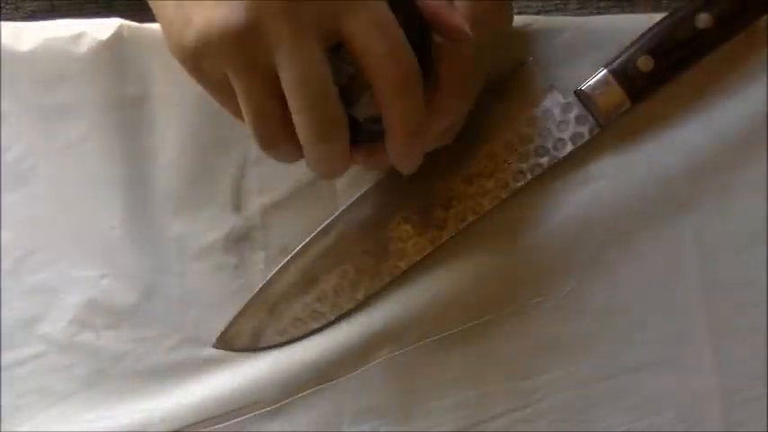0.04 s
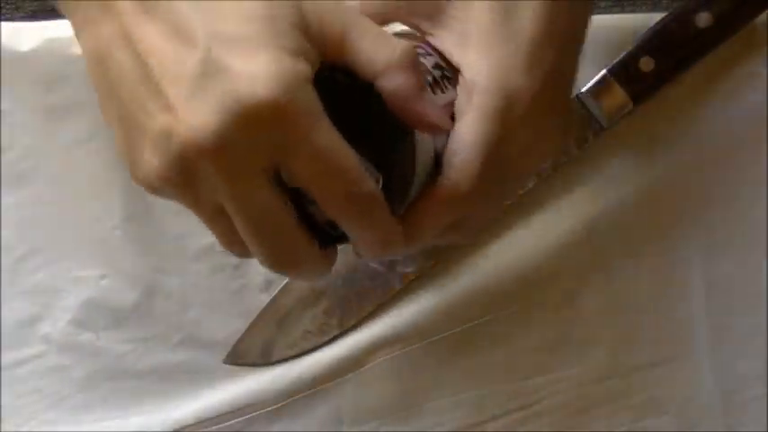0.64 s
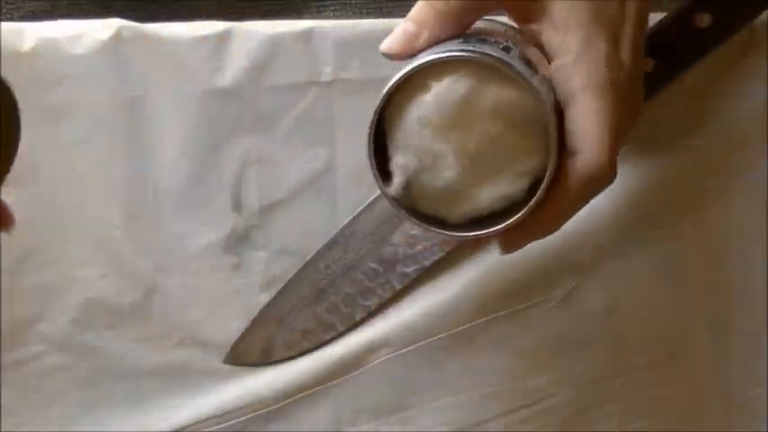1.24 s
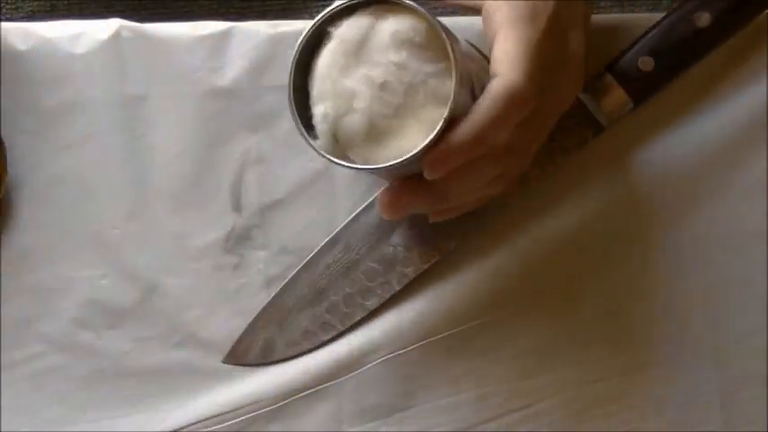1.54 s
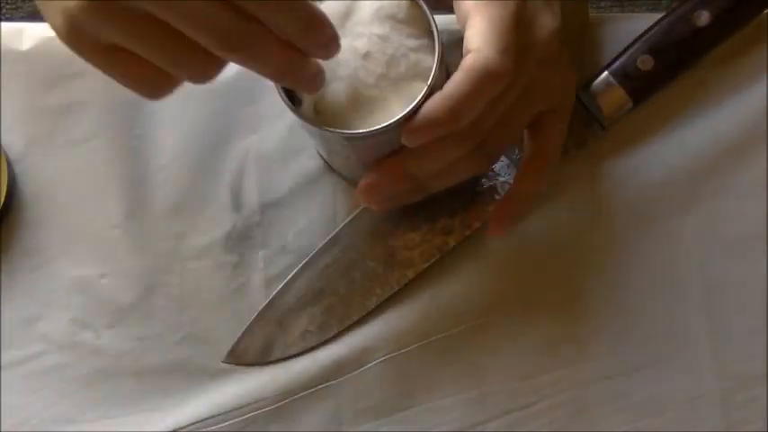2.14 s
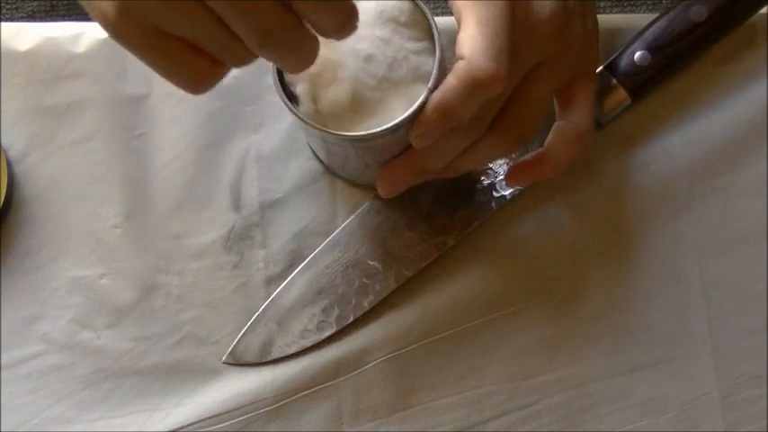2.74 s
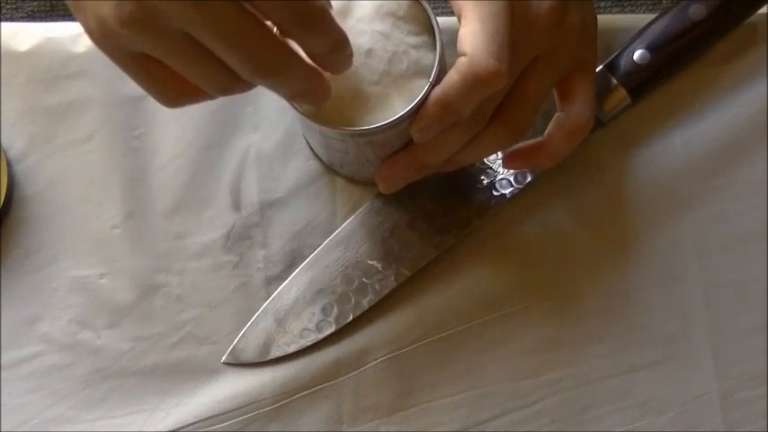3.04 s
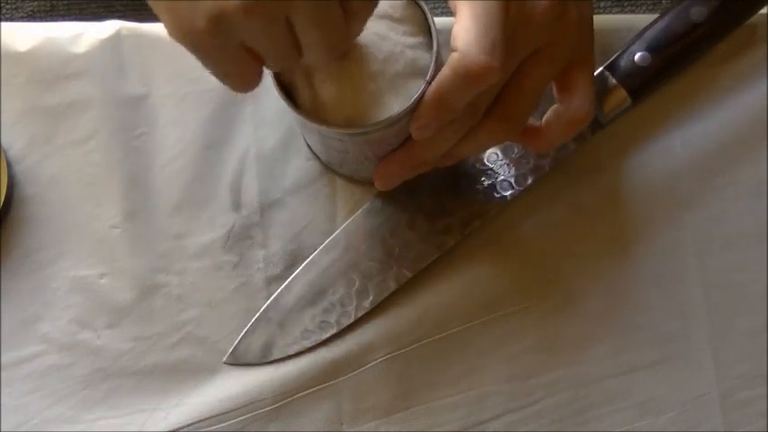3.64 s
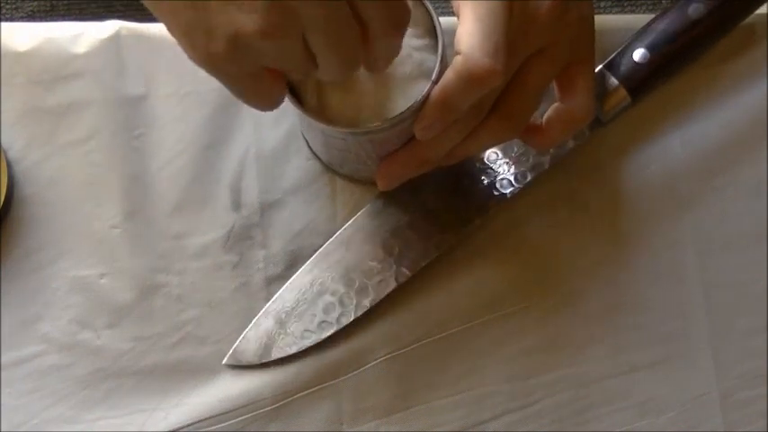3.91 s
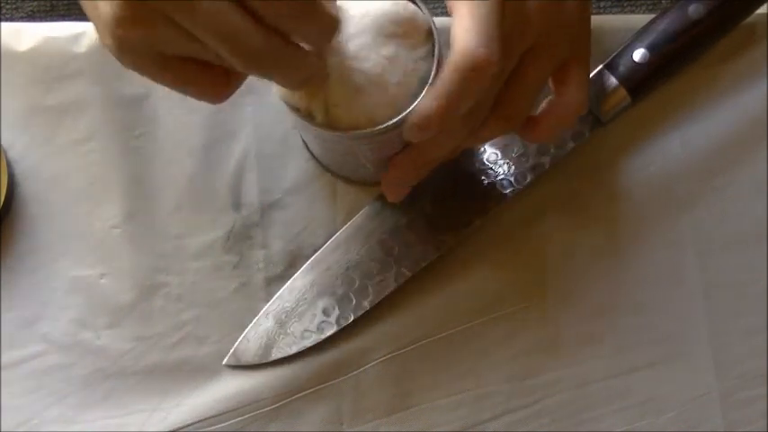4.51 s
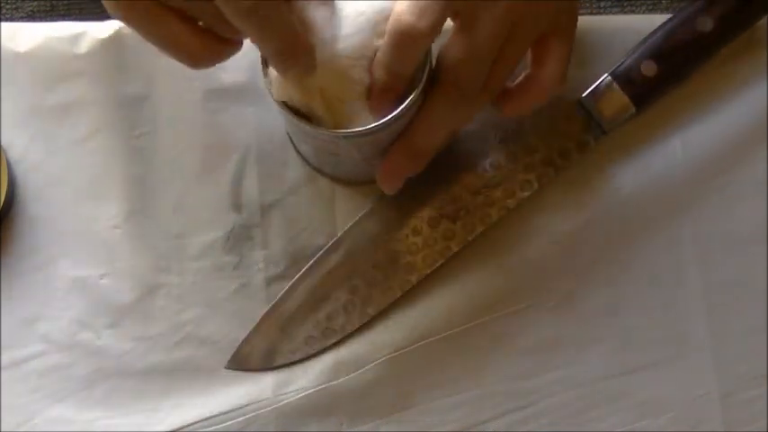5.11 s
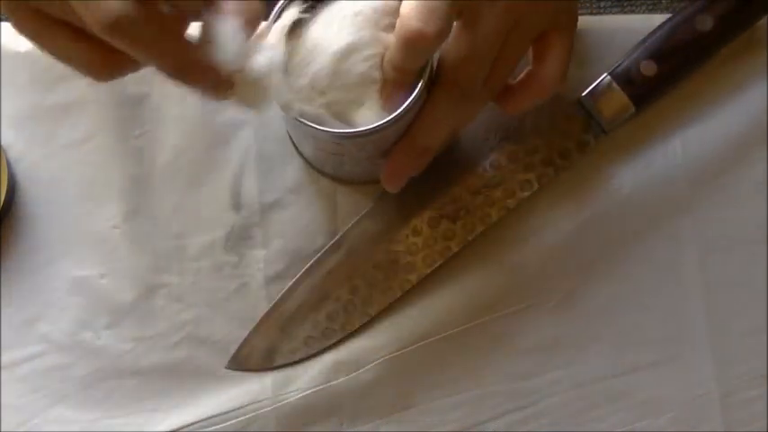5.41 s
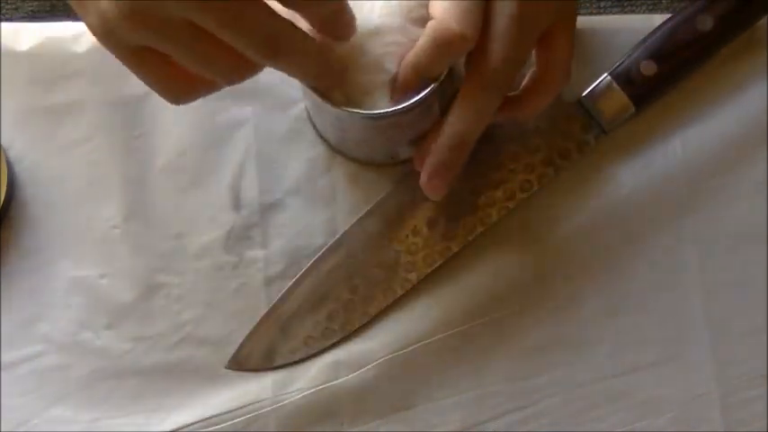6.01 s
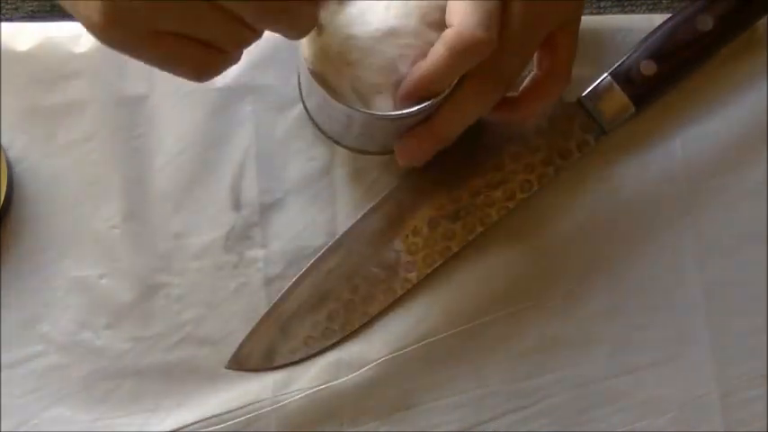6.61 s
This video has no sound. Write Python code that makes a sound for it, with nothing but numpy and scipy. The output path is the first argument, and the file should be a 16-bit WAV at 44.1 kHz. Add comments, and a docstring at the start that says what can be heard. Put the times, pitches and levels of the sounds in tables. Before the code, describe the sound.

Hands pull the lid off a small metal tin, clink it against a steel knife, then pick at wadding inside with light ticks.

```python
"""Hands knock dully on a small metal tin and drag its lid off by stick-slip friction; its wall sings briefly.
At 1.5 s the tin is set down against a steel knife on a cloth-covered table: the impact excites the modes
of tin, blade and table top. Fingers then pick at the soft wadding inside: nails tick on the rim, the tin
bumps the table, skin and fibre rub and squeak. Throughout, faint high pips come and go over a steady
rush of air in a small room, heard by a close stereo microphone."""
import sys
import numpy as np
from scipy import signal
from scipy.fft import rfft, irfft, next_fast_len
from scipy.io import wavfile
from scipy.ndimage import uniform_filter1d

SR = 44100
rng = np.random.default_rng(int(sys.argv[2]) if len(sys.argv) > 2 else 0)


def bounce(signal):
    """Save signal as a 16-bit WAV file at the path given by the first command-line argument."""
    frames = np.transpose(np.atleast_2d(signal))
    limited = np.clip(frames, -1, 1)
    pcm = np.round(limited * 32767).astype(np.int16)
    wavfile.write(sys.argv[1], SR, pcm)


N = 302526

# The tin lands against the blade and settles: (time [s], level [dB])
CLINKS = [(1.5399, -35), (1.5436, -14.5), (1.563, -26.5)]
# Spectrum of a hard contact: (frequency [Hz], spectral level [dB])
CLINK_SPECTRUM = [(250, -35), (600, 10.5), (1200, 5.5), (2060, 4), (2700, -4.5), (3300, -4), (4400, -4.5),
                  (7000, -8.5), (8800, -30), (11000, -45), (15000, -39)]

def clinks(sweep_s=0.001585, clack_hz=1950, clack_t60=0.0077, chatter_decay_s=0.0048):
    """Dispersion: treble runs ahead in thin metal as a crack; the base then clacks and chatters."""
    out, sweep_t, t = np.zeros(N), clock(sweep_s), clock(.05)
    bending_wave = signal.chirp(sweep_t, 14000, sweep_s, 500, "logarithmic")
    bending_wave *= signal.windows.tukey(len(sweep_t), .1)
    crack = signal.fftconvolve(np.diff(bending_wave), click(CLINK_SPECTRUM, tilt_db=-1.5))
    clack = ring([(clack_hz, 0, clack_t60)])
    for s, db in CLINKS:
        touches = rng.choice([-1, 1], len(t)) * (rng.random(len(t)) < .04)
        chatter = signal.fftconvolve(touches * np.exp(-t / chatter_decay_s), click(CLINK_SPECTRUM))
        add(out, s, blow(crack, db - 2))
        add(out, s + 0.000885, blow(clack, db - 6.5))
        add(out, s + 0.001034, blow(chatter, db - 9))
    return out

# Modes of tin and blade: (frequency [Hz], level [dB], T60 [s])
STEEL_MODES = [(677, -10, 0.17), (793, -5.5, 0.24), (950, -9, 0.33), (950, -4, 0.085), (1160, -15, 0.22),
               (1267, -9, 0.47), (1504, -6, 0.21), (1800, -10.5, 0.17), (1780, -31, 0.15), (1820, -30, .2),
               (2100, -5, 0.22), (2120, -5, 0.23), (3150, -0.5, 0.37), (3380, -26, .24), (4140, -22, .2),
               (4437, -19, .22), (5830, -27, .45)]

def steel_ring(rise_s=0.0011):
    """Free vibration: tin and blade ring on in their natural modes after each impact."""
    out, sound = np.zeros(N), fade_in(ring(STEEL_MODES), rise_s)
    for s, db in CLINKS:
        add(out, s, blow(sound, db - 5))
    return out

# Lid and fingers knock on the held tin: (time [s], level [dB], frequency [Hz], relative edge level [dB])
KNOCKS = [(0.5036, -37.5, 406, -31), (0.5532, -29, 432, -11), (0.6946, -37.5, 467, -8.5),
          (0.819, -25.5, 447, -22), (4.5925, -40, 675, -10)]
# Modes of the closed tin as a drum: (frequency [Hz], level [dB], T60 [s])
HOLLOW_MODES = [(373, -1, 0.021), (577.5, 1, 0.45), (661, -1.5, 0.19)]

def knocks(push_cycles=0.73, edge_decay_s=0.0028):
    """Heavy damping: the hand limits a knock to about one cycle, with a hard edge and a hollow ring."""
    out, t = np.zeros(N), clock(.05)
    for s, db, hz, edge_db in KNOCKS:
        cycles = hz * t
        push = np.sin(2 * np.pi * cycles) * cycles * np.exp(-2 * cycles / push_cycles)
        grit = rng.standard_normal(len(t)) * np.exp(-t / edge_decay_s)
        edge = signal.fftconvolve(grit, click(CLINK_SPECTRUM))
        add(out, s, blow(push, db))
        add(out, s + 0.0007, blow(edge, db + edge_db))
        add(out, s, blow(ring(HOLLOW_MODES), db - 10))
    return out

# Friction envelope of the lid, in three surges: (time [s], level [dB])
LID_DRAG = [(.818, -44), (.832, -42), (.847, -57), (.856, -37.5), (.88, -41), (.9, -49.5), (.928, -42),
            (.96, -55)]
# Spectrum of sliding contact: (frequency [Hz], spectral level [dB])
FRICTION_SPECTRUM = [(300, -15), (1200, -5), (3200, 4.5), (6500, 2), (9000, -4), (12000, -9.5),
                     (16000, -32)]

def lid_scrape():
    """Stick-slip friction: metal scrapes on metal in coarse slips as the lid is pulled off."""
    out, (times, level_db) = np.zeros(N), np.transpose(LID_DRAG)
    drag = amp(np.interp(times[0] + clock(times[-1] - times[0]), times, level_db))
    force = slips(len(drag), per_s=4000, spread_db=3) * drag
    scrape = tin_response(force, FRICTION_SPECTRUM, tilt_db=-2.5, rim_db=-7)
    add(out, times[0], np.linalg.norm(drag) * unit(scrape))
    return out

# The lid or the open tin sings when touched: (time [s], frequency [Hz], level [dB])
WALL_TONES = [(.553, 2026, -44), (.695, 3030, -54), (1.135, 2130, -45.5), (1.41, 2140, -54.5),
              (1.52, 2160, -45), (2.164, 3830, -39), (2.399, 3360, -53), (2.43, 3740, -41)]

def wall_tones(split=0.012, rise_s=0.00072):
    """Mode splitting: the tin is not quite round, so a wall mode has a weaker, lower twin."""
    out = np.zeros(N)
    for s, hz, db in WALL_TONES:
        t60 = 0.35 * (2120 / hz) ** 2.3  # higher modes die sooner
        twins = ring([(hz, db, t60), (hz * (1 - split), db - 7, t60 / 2)])
        add(out, s, fade_in(twins, rise_s))
    return out

# Nails strike the tin: (time [s], level [dB], place [0 wall to 1 rim])
TICKS = [(0.819, -36.5, 1), (0.9432, -47, 0.4), (1.2042, -49, 0.014), (1.528, -40, 0.77),
         (1.917, -46, 0.24), (2.1643, -33.5, 0.86), (2.168, -37, 0.3), (2.4, -32, 0.39),
         (2.4301, -36, 0.24), (2.488, -48.5, 0.3), (3.0641, -45, 0.88), (3.283, -41.5, 0.87),
         (3.3164, -44.5, 1), (3.441, -53, 0.84), (3.9804, -46, 0), (4.5907, -46, 0), (4.9204, -37.5, 0.87),
         (5.1919, -50, 0.29), (5.5927, -52.5, 0), (6.1329, -49.5, 0.84)]
# Spectrum of a nail contact: (frequency [Hz], spectral level [dB])
TICK_SPECTRUM = [(300, -20), (1000, 9.5), (2400, 0), (3900, 6.5), (5000, 3.5), (8500, -1), (12500, -7.5),
                 (16000, -18)]
RIM_RING_DB = (-28, 6)  # ring against direct sound, for contact on the wall and on the rim

def nail_ticks(catch=0.078):
    """Impulsive excitation: a nail catches, then slips; nearer the rim it is briefer and brighter."""
    out, t = np.zeros(N), clock(.025)
    for s, db, place in TICKS:
        decay_s, tilt_db = between((0.0045, 0.0023), place), between((-3, 3), place)
        force = unit(rng.standard_normal(len(t)) ** 3 * np.exp(-t / decay_s))
        force[0] += catch
        tick = tin_response(force, TICK_SPECTRUM, tilt_db, between(RIM_RING_DB, place), shift=0.059)
        add(out, s, blow(tick, db))
    return out

# Modes of the rim: (frequency [Hz], level [dB], T60 [s])
RIM_MODES = [(5460, 26, 0.025), (6120, 14, 0.011), (5800, -48, 0.0033), (4900, 15, 0.0089),
             (7700, 12, .012)]

def tin_response(force, spectrum, tilt_db, rim_db, shift=0.087):
    """Convolution: a force is heard directly and through the rim, whose modes shift with every grip."""
    modes = [(hz * (1 + shift * rng.uniform(-1.2, 1)), db, t60) for hz, db, t60 in RIM_MODES]
    response = amp(rim_db) * unit(ring(modes, .05))
    add(response, 0, click(spectrum, tilt_db))
    return signal.fftconvolve(force, response)

# The tin bumps the table; a pressing hand shortens the ring:
# (time [s], level [dB], contact cut-off [Hz], ring time [factor])
BUMPS = [(0.1477, -29.5, 1200, 0.32), (1.486, -36, 250, 1), (1.5437, -29, 416, 0.55),
         (1.845, -29, 1310, 0.77), (1.931, -39, 221, 0.73), (1.973, -43, 220, 0.56),
         (2.8331, -27.5, 446, 0.46), (3.79, -46.5, 300, 0.5), (4.922, -27, 1240, 0.56),
         (4.98, -27.5, 480, 1), (5.098, -32.5, 220, 0.53), (6.191, -47, 253, 0.29)]

def table_bumps(rebound_s=0.0215):
    """Mechanical coupling: the table answers each bump, its rebound, and ticks once the tin stands."""
    out, set_down_s = np.zeros(N), CLINKS[-1][0]
    for s, db, cut_hz, hold in BUMPS:
        add(out, s, thud(db, cut_hz, hold))
        add(out, s + rebound_s, thud(db - 8.5, cut_hz * 0.66, hold))  # the tin rocks back, more softly
    for s, db, _ in TICKS:
        if s > set_down_s:
            add(out, s, thud(db - 3, cut_hz=1200, hold=0.69))
    return out

# Modes of the table top: (frequency [Hz], level [dB], T60 [s])
TABLE_MODES = [(156, -13, 0.098), (190.2, -1.2, 0.32), (245.4, 2.5, 0.084), (305.6, 6, 0.053),
               (403, 2.5, 0.081), (467, -0.5, 0.072), (566, 2, 0.032), (685, -2, 0.047), (978, 6.5, 0.014),
               (1077, -7, 0.038), (1730, -7.5, 0.017)]

def thud(db, cut_hz, hold, shift=0.1, uneven_db=2):
    """Contact as a low-pass filter: the softer the tap, the fewer upper modes of the table answer."""
    t = clock(.5)
    modes = np.zeros(len(t))
    for hz, mode_db, t60 in TABLE_MODES:
        detune, uneven = rng.uniform(-1, 1, 2) * (hz > 300)  # upper modes vary with the spot struck
        decay = amp(mode_db + uneven_db * uneven - 60 * t / (t60 * hold))
        contact_gain = 1 / np.hypot(1, np.square(hz / cut_hz))
        build = 1 - np.exp(-t * hz)  # a mode takes about a cycle to get going
        modes += contact_gain * decay * build * np.sin(2 * np.pi * hz * (1 + shift * detune) * t)
    cycles = 0.42 * cut_hz * t
    tap = np.sin(2 * np.pi * cycles) * np.exp(-cycles / 0.42)
    return -blow(modes, db + 3) - blow(tap, db - 13)

# Skin and wadding slide over the tin: (time [s], duration [s], level [dB], place [0 wall to 1 rim])
RUBS = [(0.133, 0.092, -52.5, 0.48), (0.563, 0.045, -55, 0.47), (1.41, .163, -59, 0.44),
        (1.601, 0.098, -51, 0.47), (1.695, .09, -55, 0.59), (2.708, 0.033, -53.5, .05),
        (3.782, 0.058, -59.5, .95), (4.683, 0.068, -56, 0), (5.153, 0.33, -68, 0.75),
        (5.392, 0.079, -56, 0.59), (6.141, 0.11, -67, .9), (6.269, .2, -63, 1)]

def rubs():
    """Sliding friction: firm strokes of skin and wadding excite the tin."""
    out = np.zeros(N)
    for s, length_s, db, place in RUBS:
        add(out, s, stroke(length_s, db, place))
    return out

def stroke(length_s, db, place, fingers=3):
    """Incoherent summation: each finger slips in its own way while the pressure swells and fades."""
    size = int(length_s * SR)
    pressure = np.interp(np.linspace(0, 1, size), [0, 0.34, 1], [0, 1, 0]) ** 0.32
    tilt_db, rim_db = between((-7, 9.5), place), between(RIM_RING_DB, place)  # brighter at the rim
    forces = (slips(size, per_s=6000, spread_db=2) * pressure for _ in range(fingers))
    sound = sum(tin_response(force, FRICTION_SPECTRUM, tilt_db, rim_db) for force in forces)
    return amp(db) * np.sqrt(size) * unit(sound)

def slips(size, per_s, spread_db):
    """Friction as shot noise: a dense, random run of tiny slips of uneven strength."""
    strength = np.minimum(rng.exponential(1, SR // 2), 4)
    slipping = rng.random(SR // 2) < per_s / SR
    sign = rng.choice([-1, 1], SR // 2)
    return (sign * amp(spread_db * strength) * slipping)[:size]

# Fingertips squeak on the metal: (time [s], duration [s], frequency [Hz], level [dB])
SQUEAKS = [(0.85, 0.014, 5488, -38.5), (.938, .0102, 6840, -45), (4.678, .043, 2700, -59.5),
           (4.681, .057, 8450, -60.5), (4.93, .018, 8800, -49), (6.133, .019, 5430, -50.5)]

def squeaks(wobble=0.052):
    """Stick-slip oscillation: skin grips and releases at a high, unsteady rate."""
    out = np.zeros(N)
    for s, length_s, hz, db in SQUEAKS:
        drift = uniform_filter1d(rng.standard_normal(SR // 4), size=25) * np.sqrt(25)
        slip_hz = hz * (1 + wobble * drift[:int(length_s * SR)])
        tone = np.sin(2 * np.pi * np.cumsum(slip_hz) / SR)
        add(out, s, 2 * amp(db) * tone * np.hanning(len(tone)))
    return out

def plucks(start_s=2.7, per_s=5, mean_length_s=.08, mean_db=-66.5, spread_db=4):
    """Light friction: fingers pluck at the wadding at a loose, uneven pace."""
    out = np.zeros(N)
    for k, (late, length, strength, place) in enumerate(rng.random(size=(30, 4))):
        s = start_s + (k + late) / per_s
        db = mean_db + spread_db * (2 * strength - 1)
        if s < N / SR:
            add(out, s, stroke(mean_length_s * (.5 + length), db, between((.15, .75), place)))
    return out

# Runs of faint pips: (start [s], end [s], chance that a beat sounds [0 to 1])
PIP_RUNS = [(0.048, .7, 0.29), (1.739, 2.11, 0.99), (2.868, 4.82, .35), (5.589, 6.84, 0.57)]

def pips(hz=3900, spacing_s=.0335, db=-53, uneven_db=5):
    """Windowed tone bursts: very faint high pips come and go on a quick, even beat."""
    out, t = np.zeros(N), clock(.008)
    pip = np.hanning(len(t)) * np.sin(2 * np.pi * hz * t)
    for start, end, chance in PIP_RUNS:
        for s, (draw, weakness) in zip(np.arange(start, end, spacing_s), rng.random(size=(80, 2))):
            if draw < chance:
                add(out, s, amp(db - uneven_db * weakness) * pip)
    return out

# The rush of air and its bass end, both: (frequency [Hz], spectral level [dB])
AIR_SPECTRUM = [(88, -34), (150, -4.5), (213, 0.5), (296, -4.5), (366, -1.5), (481, -3), (751, -5),
                (827, -5.5), (894, -7.5), (1340, -8.5), (2650, -19), (3980, -21.5), (4650, -22.5),
                (5650, -24), (15500, -33)]
RUMBLE_SPECTRUM = [(20, -27.5), (40, -20), (52, -20), (60, -6), (72, -14), (100, -16), (125, -15)]
# Likeness of the air at left and right: (frequency [Hz], correlation [-1 to 1])
AIR_CORRELATION = [(60, -0.47), (120, 0.078), (240, 0.45), (480, 0.618), (950, 0.67), (1890, 0.54),
                   (3770, 0.253), (7520, 0.23), (15000, 0.12)]

def air(db=-49, waver_db=1.93):
    """Broadband noise: air rushes steadily in the room, its level wavering slightly."""
    hz = np.fft.rfftfreq(N, 1 / SR)
    spectrum = RUMBLE_SPECTRUM + [point for point in AIR_SPECTRUM if point[0] > 140]
    mid, side = rfft(rng.standard_normal((2, N))) * amp(read(spectrum, hz))
    rush = np.sqrt(2 * N) * unit(irfft(stereo(mid, side, AIR_CORRELATION), N))
    sway = np.interp(np.arange(N), np.linspace(0, N, 60), rng.standard_normal(60))
    return amp(db - waver_db * sway) * rush

# Reverberation time: (frequency [Hz], T60 [s])
ROOM_T60 = [(150, 0.13), (500, 0.39), (1200, 0.25), (3000, 0.3), (7000, 0.34), (14000, 0.083)]
# Colour of the reverberation: (frequency [Hz], gain [dB])
ROOM_SPECTRUM = [(150, 0.5), (400, -2), (900, -0.5), (2000, -4.5), (4000, -8), (7000, -8.5), (14000, 3.5)]

def room(x, wet_db, correlation=0.88, low_hz=60, build_s=0.004):
    """Reverberation: dense reflections follow the direct sound and die away band by band."""
    band_hz, t, bands = signal.stft(rng.standard_normal((2, SR // 2)), SR, nperseg=256)
    bands /= abs(bands) + 1e-9  # reflections of about equal strength
    decay = amp(-60 * t / read(ROOM_T60, band_hz)[:, None])
    tails = signal.istft(bands * decay, SR, nperseg=256)[1]
    tails *= 1 - np.exp(-(np.arange(tails.shape[1]) / SR / build_s) ** 2)
    size = next_fast_len(N + SR, True)
    direct, hz = rfft(x, size), np.fft.rfftfreq(size, 1 / SR)
    bass_cut = hz ** 2 / np.hypot(hz ** 2, low_hz ** 2)  # below low_hz a source hardly fills the room
    send = direct * amp(wet_db + read(ROOM_SPECTRUM, hz)) * bass_cut
    mid, side = (send * rfft(unit(tail), size) for tail in tails)
    reflections = stereo(mid, side, [(1, correlation)])
    return irfft(stereo(direct, direct, [(1, 0.98)]) + reflections, size)[:, :N]

# Stereo balance: (frequency [Hz], left minus right [dB])
BALANCE = [(60, -4), (150, 2.0), (380, 1.5), (950, 1.5), (2380, 0), (5980, 0.5), (15000, 0.0)]

def stereo(mid, side, correlation):
    """Mid-side mixing: two spectra form a partly alike left and right, leaning to the left."""
    hz = np.linspace(0, SR / 2, len(mid))
    alike = np.clip(read(correlation, hz), -1, 1)
    mid, side = mid * np.sqrt((1 + alike) / 2), side * np.sqrt((1 - alike) / 2)
    lean = amp(read(BALANCE, hz) / 2)
    return np.array([(mid + side) * lean, (mid - side) / lean])

def ring(modes, length_s=.5):
    """Modal superposition: a struck body sounds as a sum of damped sines."""
    t = clock(length_s)
    return sum(amp(db - 60 * t / t60) * np.sin(2 * np.pi * hz * t) for hz, db, t60 in modes)

def click(spectrum, tilt_db=0, size=2048):
    """Minimum phase: the shortest causal pulse of a spectrum, tilted by tilt_db per octave above 1 kHz."""
    hz = abs(np.fft.fftfreq(size, 1 / SR))
    octaves = np.log2(np.maximum(hz, 1000) / 1000)
    log_gain = np.log(amp(read(spectrum, hz) + tilt_db * octaves))
    return unit(np.fft.ifft(np.exp(np.conj(signal.hilbert(log_gain)))).real)

def fade_in(x, rise_s):
    """Exponential onset of a vibration."""
    return x * (1 - np.exp(-np.arange(len(x)) / SR / rise_s))

def blow(x, db):
    """Scales a hit so that its energy, packed into 5 ms, has this level."""
    return amp(db) * unit(x) * np.sqrt(.005 * SR)

def unit(x):
    """Normalises to energy 1."""
    return x / np.sqrt(np.sum(x ** 2) + 1e-20)

def amp(db):
    """Decibels to gain."""
    return 10 ** (np.asarray(db) / 20)

def read(points, hz):
    """Interpolates a table on a log-frequency axis."""
    f, value = np.transpose(points)
    return np.interp(np.log(hz + 1), np.log(f + 1), value)

def between(ends, place):
    """Interpolates between two ends, at place 0 and place 1."""
    return np.interp(place, [0, 1], ends)

def clock(length_s):
    """Sample times from zero."""
    return np.arange(int(length_s * SR)) / SR

def add(mix, s, sound):
    """Superposes a sound on the mix at time s."""
    part = mix[max(round(s * SR), 0):][:len(sound)]
    part += sound[:len(part)]

def scene(low_hz=140):
    """Superposition: handling in the room, its bass cut by the microphone's high-pass, over the air."""
    impacts = room(knocks(), wet_db=-6) + room(clinks(), wet_db=-1)
    impacts += room(nail_ticks(), wet_db=-2, correlation=0.7)
    ringing = room(steel_ring() + wall_tones() + pips(), wet_db=-10)
    friction = room(lid_scrape() + rubs() + plucks() + squeaks(), wet_db=-6.5, correlation=0.17)
    table = room(table_bumps(), wet_db=-1, low_hz=310)
    highpass = signal.butter(7, low_hz, "highpass", fs=SR, output="sos")
    return signal.sosfilt(highpass, impacts + ringing + friction + table) + air()

def record(dry, ceiling=.72, edge_hz=15900):
    """Soft saturation rounds off the very highest peaks; a low-pass filter then limits the band."""
    rounded = dry / (1 + (dry / ceiling) ** 4) ** .25
    lowpass = signal.firwin(511, edge_hz, window=("kaiser", 9), fs=SR)
    return signal.oaconvolve(rounded, lowpass[None], "same")

dry = scene()
out = record(dry)
bounce(out)
```